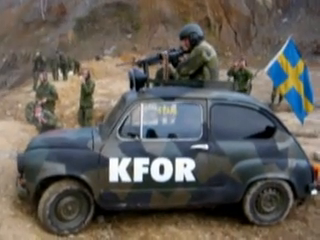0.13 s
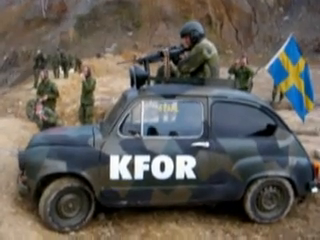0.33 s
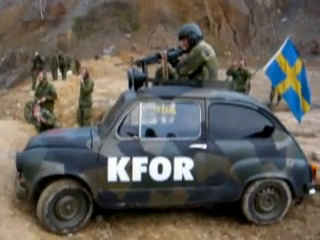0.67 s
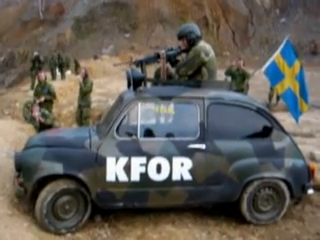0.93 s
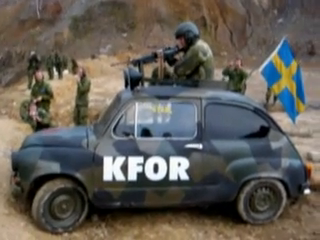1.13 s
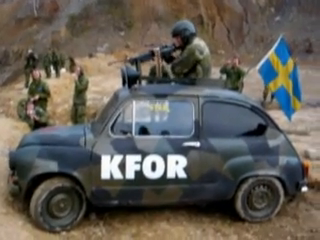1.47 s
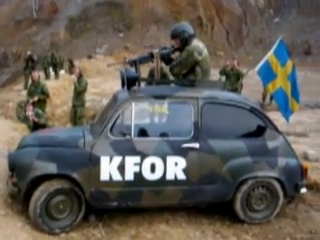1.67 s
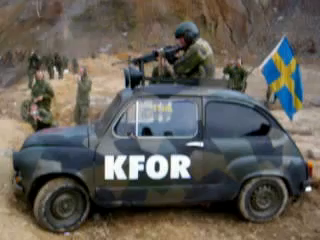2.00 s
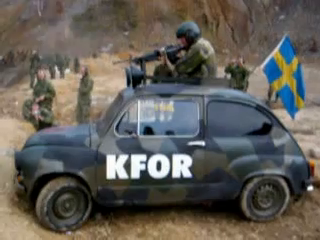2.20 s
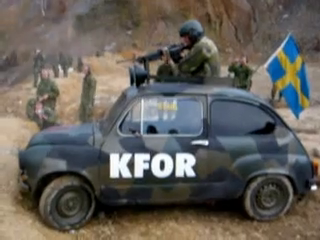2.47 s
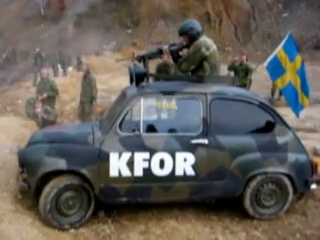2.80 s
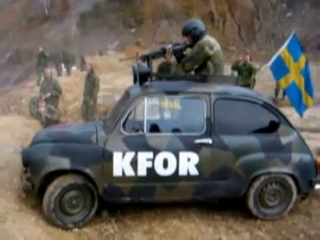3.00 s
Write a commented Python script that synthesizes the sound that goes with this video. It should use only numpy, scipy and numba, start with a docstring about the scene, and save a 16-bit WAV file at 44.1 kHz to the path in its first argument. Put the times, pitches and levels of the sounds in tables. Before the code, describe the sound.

A rapid machine-gun burst, harsh and distorted at a close microphone, comes after two seconds of low, flickering echo roar outdoors, a few distant thuds and a quick rattle of bolt and belt.

```python
"""First the roar of earlier fire swells back from the slopes of a quarry and fades, with far thuds and a faint tick.
Just before 2 s the bolt and belt clatter, then a machine gun on a small car's roof fires a long burst close by.
Each blast is a sharp pressure pulse that rings the car body, comes back from the same surfaces every time
and drives the microphone rail to rail; gain control pulls the level down. The roll is flickering bands of noise."""
import sys
import numpy as np
from scipy import signal
from scipy.fft import rfft, irfft
from scipy.io import wavfile
from scipy.ndimage import uniform_filter1d
from numba import njit

SR = 44100
rng = np.random.default_rng(int(sys.argv[2]) if len(sys.argv) > 2 else 0)


def invert_db(level):
    """Linear amplitude ratio for a level in decibels (20 dB per decade), elementwise."""
    return 10 ** (np.asarray(level, dtype=float) / 20)


def materialize(psi):
    """Save the field psi as 16-bit PCM at rate SR to the path in sys.argv[1].

    A 1-D psi becomes a single channel; in a 2-D psi each row is a channel.
    """
    bounded = np.clip(np.atleast_2d(psi).T, -1, 1)
    quanta = np.round(bounded * 32767).astype(np.int16)
    wavfile.write(sys.argv[1], SR, quanta)


N = 138474
T = np.arange(N) / SR  # time [s]

# Shots of the burst: (time [s], blast level [dB], time until the microphone's overshoot lets go [s])
SHOTS = [(2.019, 26, 0.052), (2.0862, 24.5, 0.045), (2.1542, 23, 0.043), (2.2212, 23, 0.046),
         (2.2906, 21.5, 0.042), (2.3585, 24, 0.047), (2.4262, 20.5, 0.041), (2.4950, 23.5, 0.047),
         (2.5650, 22, 0.046), (2.6347, 23, 0.048), (2.7052, 23.5, 0.048), (2.7750, 22.5, 0.046),
         (2.8444, 22, 0.052), (2.9139, 21.5, 0.047), (2.9835, 21, 0.045), (3.0482, 21, 0.047),
         (3.1142, 22.5, 0.078)]
# Car body tones rung by each blast, relative to one another: (frequency [Hz], level [dB], time to fall 60 dB [s])
BODY_TONES = [(164.7, -5, 0.14), (198.9, -8.5, 0.07), (268, -9, 0.26), (373, -8.5, 0.23), (536, 3.5, 0.075),
              (620, 0.5, 0.052), (613, 8, 0.082), (828, 5, 0.061), (886, -6, .1), (1051.5, -25, 0.051),
              (1247, -17, 0.027), (1467, -3, 0.023), (1700, -9, 0.025), (2540, -23.5, .06)]
# Distinct echoes off car, ground and rock, relative to the blast:
# (delay [s], level [dB], half length [s], sign and scale [positive = pressure, negative = suction])
ECHOES = [(.0007, -6, 0.00045, 1), (.0021, -2, .00025, 1), (.0043, -7, 0.00031, 1),
          (.0057, -2.5, 0.0004, 1), (.0078, -9.5, 0.00044, 1), (.0085, -8.5, 0.00016, 1),
          (0.0115, -9.5, 0.00013, 1), (0.0138, 1.5, 0.00078, 0.9), (0.0145, -16, 0.00027, -1),
          (0.0156, -21, 0.00036, 1), (0.0177, -18.5, .0007, 0.9), (.0219, -13.5, .00045, -1),
          (.0230, -14, 0.00024, -1), (.0258, 4, 0.00021, -1), (0.0302, -11, .0002, -1),
          (0.0352, -23.5, 0.00045, -0.9), (.0370, -19.5, 0.00031, -1), (.0414, -21, 0.00064, -1),
          (0.0441, -33.5, 0.00069, -1)]
# Bolt and belt clatter before the first shot: (time [s], level [dB], time to fall 60 dB [s])
BOLT_CLICKS = [(1.971, -19.5, .06), (1.9769, -17.5, 0.024), (1.99, -9, 0.03), (1.9997, -26.5, .04),
               (2.0077, -16.5, 0.033), (2.01, -11.5, 0.062), (2.014, -19, 0.033)]
# Ringing bands of the gun's steel: (centre [Hz], width of each of two filter passes [Hz], relative level [dB])
STEEL_BANDS = [(2400, 2200, 5), (4980, 900, 7.5), (3800, 500, -2)]
# Roll of earlier fire: (time [s], level [dB], centre of the hollow band [Hz],
# bass [dB], upper middle [dB], treble [dB]); the last three act as changes about their own averages
ROLL = [(0.03, -32.5, 760, -2.5, -9, -10.5), (0.201, -30.5, 750, -7, -8, -10),
        (0.33, -27, 740, -8, -9, -12), (0.588, -22, 760, -6.5, -10, -15.5),
        (0.8, -20.5, 720, -6.5, -10.5, -21), (0.879, -24, 690, -7, -7.5, -17.5),
        (1.1, -25, 620, -11, -9, -24.5), (1.38, -25.5, 559, -13, -12.5, -29.5),
        (1.449, -27.5, 547, -10, -11, -29.5), (1.626, -27, 545, -11.5, -15, -34),
        (1.798, -30, 547, -11.5, -14.5, -33), (1.939, -31, 568, -12, -16, -35)]
# Average tone colour of the roll: (frequency [Hz], level per Hz [dB])
ROLL_COLOUR = [(30, 3), (90, -6), (170, 1), (260, -4.5), (330, -4), (600, -8.5), (900, -7), (1400, -12.5),
               (2000, -12), (2600, -13), (2900, -20.5), (3600, -21), (5000, -34.5), (6500, -42)]
# Far thuds within the roll: (time [s], level [dB], frequency [Hz])
THUDS = [(0.65, -15, 200), (.710, -7.5, 262), (.760, -24, 302), (.790, -7, 320), (.831, -9.5, 700),
         (1.425, -26, 406), (1.74, -11.5, 466), (1.81, -30, 497)]

# Each blast; levels here are relative to it
BLAST_HALF_S, BODY_DB = 0.00016, -28
CRACKLE_DB, CRACKLE_T60_S = -15, 0.094  # bright grit of the muzzle gas
SCATTER_DB, SCATTER_T60_S, SCATTER_TOP_HZ = -14.5, 0.12, 1600  # dense near echoes
SAME_SHARE = 0.7  # share of the scatter's power that is alike from shot to shot
QUARRY_DB, QUARRY_T60_S, QUARRY_TOP_HZ = -41, 0.7, 990
# The microphone sags, then overshoots, equally far at every shot
SAG_DB, SAG_START_S, SAG_RECOVERY_S = 17, 0.001, 0.0095
SURGE_DB, SURGE_RISE_S, LET_GO_S = 7, 0.011, 0.007
# Clatter of the action after every shot, and the faint high tick
ACTION_DB, ACTION_DELAY_S, ACTION_T60_S = -22.5, 0.062, 0.06
TICK_S, TICK_DB, TICK_HZ = 0.552, -40, 5500
# The roll
HOLLOW_DB, HOLLOW_WIDTH_HZ = 8, 160  # boost added as power on top of the plain band
FLICKER_DB = 1.0  # scale of the random level changes
# Microphone and gain control (sample values have full scale = 1)
RAIL, KNEE = 0.88, 4.5  # overload limit, and how sharply it sets in
DROOP_HZ, RUMBLE_HZ, HISS_DB = 70, 40, -50
AGC_TOP, AGC_ATTACK_S, AGC_RELEASE_S, AGC_SLOPE = 0.21, 0.012, 0.4, 0.71
OFFSET_REST, OFFSET_START, OFFSET_FULL = -0.08, 0.3, 0.3  # start and full are added to rest
CHARGE_S, DRAIN_S, BUSY_S = 0.28, 0.68, 0.3
TOP_HZ, CEILING = 5780, 0.95


def unit(x):
    """Scale to an rms (average strength) of 1."""
    return x / np.sqrt(np.mean(x ** 2))


def band(x, hz, width_hz):
    """Two-pole band-pass: keeps the sound around one frequency."""
    return signal.lfilter(*signal.iirpeak(hz, hz / width_hz, fs=SR), x)


def dull(x, hz):
    """Two-pole low-pass: takes off the treble, then scales to rms 1."""
    return unit(signal.lfilter(*signal.butter(2, hz, fs=SR), x))


def fade(t, t60):
    """Exponential decay that starts at t = 0 and falls 60 dB in t60 seconds."""
    return (t >= 0) * invert_db(-60 * np.maximum(t, 0) / t60)


def walk(rate):
    """Random levels held for 1 / rate seconds, then smoothed twice."""
    hold = int(SR / rate)
    steps = np.repeat(rng.standard_normal(N // hold + 1), hold)
    return 0.6 * uniform_filter1d(uniform_filter1d(steps, hold), hold)[:N]


@njit
def follow(x, up, down, e):
    """Follow a signal from level e, with separate speeds for rise and fall."""
    y = np.empty(len(x))
    for i in range(len(x)):
        e += (x[i] - e) * (up if x[i] > e else down)
        y[i] = e
    return y


def gun():
    """Every shot sends out a blast, and the same surroundings answer it; the action clatters after it."""
    t = T[:SR // 4]
    answer = blast_and_echoes(t)
    same = dull(rng.standard_normal(len(t)), SCATTER_TOP_HZ)
    out, kicks = np.zeros(N + len(t)), np.zeros(N)
    for s, db, hold_s in SHOTS:
        i = int(s * SR)
        fresh = dull(rng.standard_normal(len(t)), SCATTER_TOP_HZ)
        scatter = np.sqrt(SAME_SHARE) * same + np.sqrt(1 - SAME_SHARE) * fresh
        scatter = invert_db(SCATTER_DB) * scatter * fade(t, SCATTER_T60_S)
        crackle = invert_db(CRACKLE_DB) * rng.standard_normal(len(t)) * fade(t, CRACKLE_T60_S)
        action = steel(rng.standard_normal(len(t))) * fade(t - ACTION_DELAY_S, ACTION_T60_S)
        shot = invert_db(db) * (answer + crackle + scatter)
        out[i:i + len(t)] += shot + microphone_swing(t, hold_s) + invert_db(ACTION_DB) * action
        kicks[i] = invert_db(db)
    return out[:N] + quarry(kicks)


def blast_and_echoes(t):
    """An N-shaped pressure pulse, the tones it rings in the car body, and its distinct echoes."""
    pulse = -(1 - t / BLAST_HALF_S) * (t < 2 * BLAST_HALF_S)
    body = sum(invert_db(db) * np.sin(2 * np.pi * hz * t) * fade(t, t60) for hz, db, t60 in BODY_TONES)
    echoes = sum(sign * invert_db(db) * np.exp(-((t - s) / half_s) ** 4) for s, db, half_s, sign in ECHOES)
    return pulse - invert_db(BODY_DB) * body + echoes


def microphone_swing(t, hold_s):
    """The blast makes the microphone sag at once, then overshoot until it lets go."""
    rise = (t / SURGE_RISE_S) ** 2
    surge = invert_db(SURGE_DB) * rise / (1 + rise) / (1 + np.exp((t - hold_s) / LET_GO_S))
    sag = invert_db(SAG_DB) * (1 - np.exp(-t / SAG_START_S)) * np.exp(-t / SAG_RECOVERY_S)
    return surge - sag


def quarry(kicks):
    """Far echoes of the quarry: each kick sets off the same dull, fading noise."""
    far = dull(rng.standard_normal(SR), QUARRY_TOP_HZ) * fade(T[:SR], QUARRY_T60_S)
    return signal.fftconvolve(kicks, far * invert_db(QUARRY_DB))[:N]


def steel(noise):
    """Noise filtered into the ringing bands of the gun's steel."""
    return unit(sum(invert_db(db) * band(band(noise, hz, w), hz, w) for hz, w, db in STEEL_BANDS))


def bolt():
    """The bolt runs forward along the belt: fading bursts of steel noise."""
    envelope = sum(invert_db(db) * fade(T - s, t60) for s, db, t60 in BOLT_CLICKS)
    return steel(rng.standard_normal(N)) * uniform_filter1d(envelope, 60)


def tick():
    """One faint high tick long before the burst: a narrow band of noise that fades fast."""
    noise = unit(band(rng.standard_normal(N), TICK_HZ, 900))
    return invert_db(TICK_DB) * noise * fade(T - TICK_S, 0.042)


def over_time(values):
    """Straight lines through values given at the times of the roll."""
    return np.interp(T, [row[0] for row in ROLL], values)


def roll():
    """Third-octave bands of far echo flicker one by one; a hollow band slides, bass and treble fade apart."""
    _, level, centre, *parts = np.array(ROLL).T
    centre = over_time(centre)
    bass, upper, treble = (over_time(v - v.mean()) for v in parts)
    out = 0
    for hz in 32 * 2 ** (np.arange(24) / 3):
        # how far this band belongs to the bass, upper middle and treble
        db = np.interp(hz, [250, 500], [1, 0]) * bass
        db += np.interp(hz, [1000, 1600, 2800, 4000], [0, 1, 1, 0]) * upper
        db += np.interp(hz, [2800, 4000], [0, 1]) * treble
        hollow = invert_db(2 * HOLLOW_DB) * np.exp(-((hz - centre) / HOLLOW_WIDTH_HZ) ** 2)
        db += 10 * np.log10(hz * (1 + hollow))  # wider bands hold more power
        db += FLICKER_DB * walk(18)
        noise = band(band(rng.standard_normal(N), hz, hz / 3), hz, hz / 3)
        out = out + invert_db(db) * unit(noise)
    out = colour(out)
    steady = out / np.sqrt(uniform_filter1d(out ** 2, SR // 3))
    return steady * invert_db(over_time(level))


def colour(x):
    """Shape the spectrum to the average tone colour of the roll."""
    hz, db = np.array(ROLL_COLOUR).T
    bins = np.log(np.arange(N // 2 + 1) * SR / N + 1)
    return irfft(rfft(x) * invert_db(np.interp(bins, np.log(hz), db)), N)


def thuds():
    """Far thuds: each is a very short sine wave that swells and dies within about one cycle."""
    out = np.zeros(N)
    for s, db, hz in THUDS:
        out += invert_db(db) * np.sin(2 * np.pi * hz * (T - s)) * np.exp(-((T - s) * hz / 0.3) ** 2)
    return out


def scene():
    """Gun near, echoes far."""
    return (gun() + bolt() + tick() + roll() + thuds())[None]


def gain_control(x):
    """Turn the sound down while its followed level is above the top; recover slowly."""
    level = follow(np.abs(x), 1 / (AGC_ATTACK_S * SR), 1 / (AGC_RELEASE_S * SR), 0.)
    return x * np.minimum(1, AGC_TOP / (level + 1e-9)) ** AGC_SLOPE


def overload_offset(dry):
    """A constant shift that charges while the input overloads, and drains afterwards."""
    busy = follow(1. * (np.abs(dry) > RAIL), 1., 1 / (BUSY_S * SR), 0.)
    charge = follow(OFFSET_FULL * busy, 1 / (CHARGE_S * SR), 1 / (DRAIN_S * SR), OFFSET_START)
    return OFFSET_REST + charge


def low_pass(x):
    """Removes everything above the highest recorded frequency."""
    return signal.sosfilt(signal.butter(12, 6880, fs=SR, output="sos"), x)


def record(dry):
    """Overload at the rails, bass droop, hiss, gain control, the overload's offset, and a narrow top."""
    x = dry[0] / (1 + np.abs(dry[0] / RAIL) ** KNEE) ** (1 / KNEE)
    x = signal.lfilter(*signal.butter(1, DROOP_HZ, "high", fs=SR), x)
    x = x + invert_db(HISS_DB) * rng.standard_normal(N)
    x = signal.lfilter(*signal.butter(1, RUMBLE_HZ, "high", fs=SR), x)
    x = gain_control(x) + overload_offset(dry[0])
    # filter around the first value, so that the offset makes no jump at the start
    x = signal.sosfilt(signal.butter(20, TOP_HZ, fs=SR, output="sos"), x - x[0]) + x[0]
    mix = np.clip(x, -CEILING, CEILING)[None]
    return low_pass(mix)


dry = scene()
out = record(dry)
materialize(out)
```